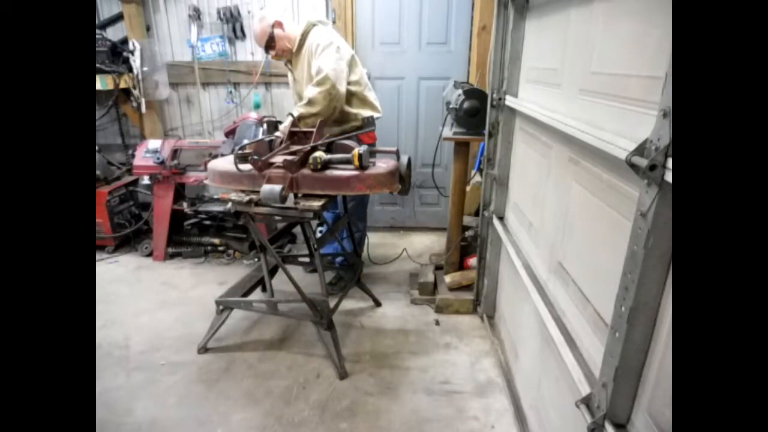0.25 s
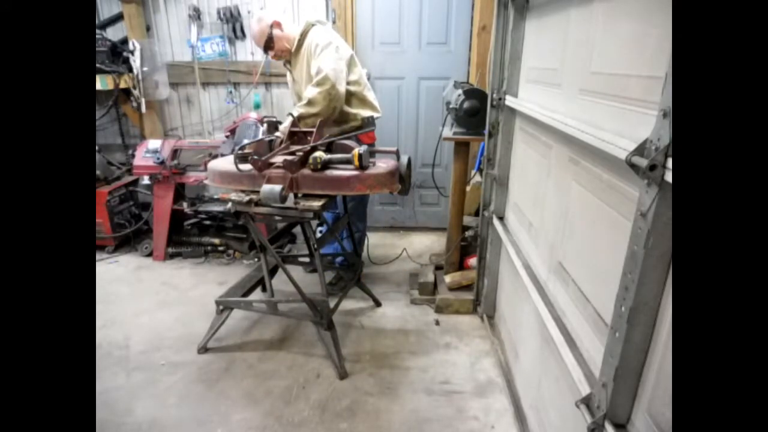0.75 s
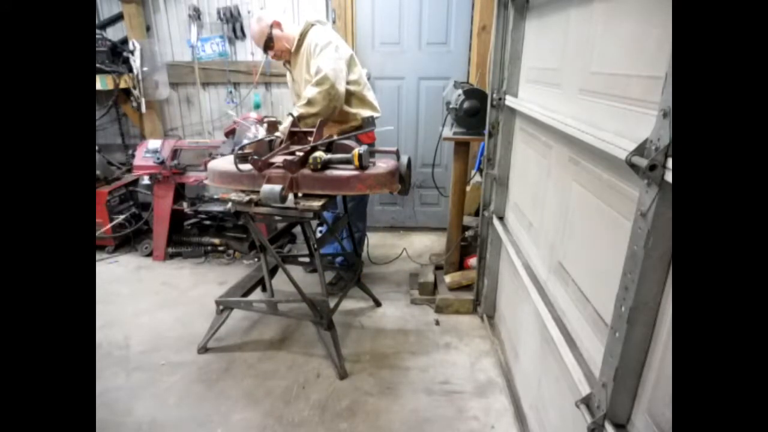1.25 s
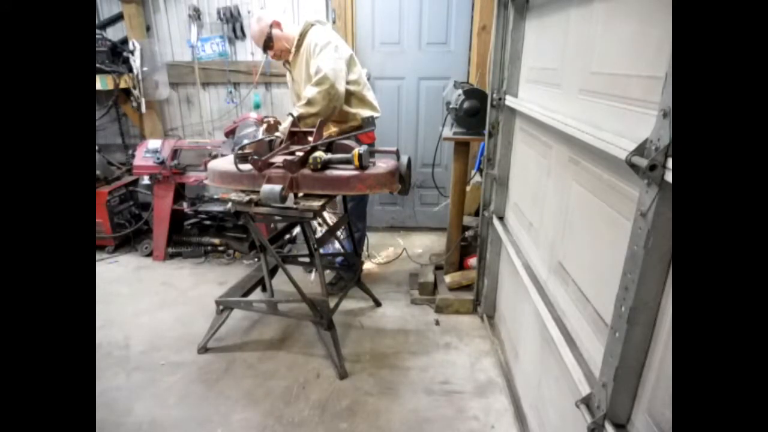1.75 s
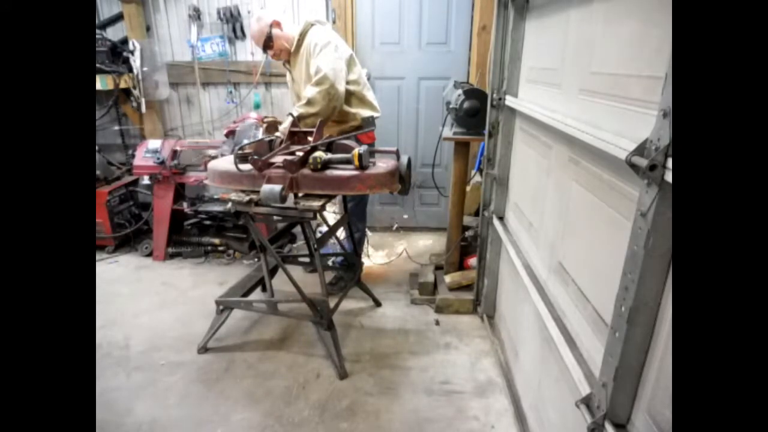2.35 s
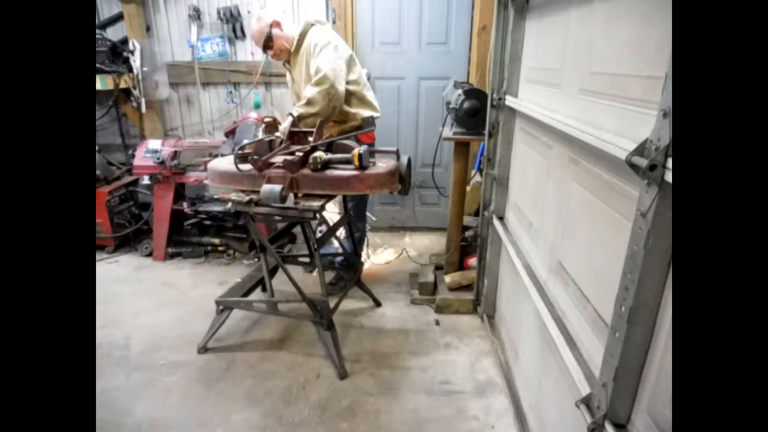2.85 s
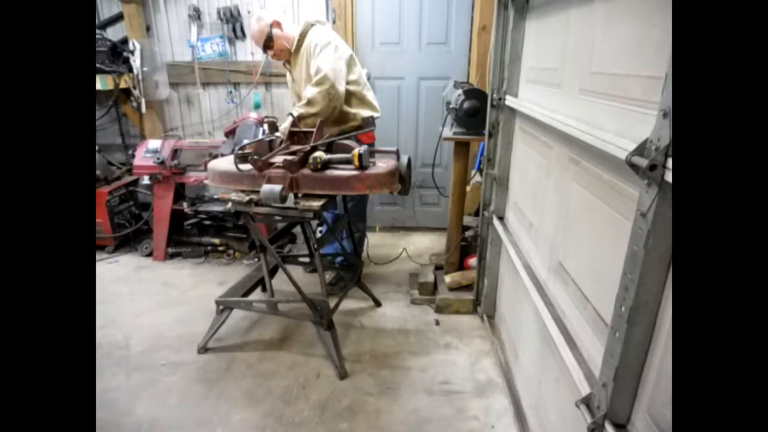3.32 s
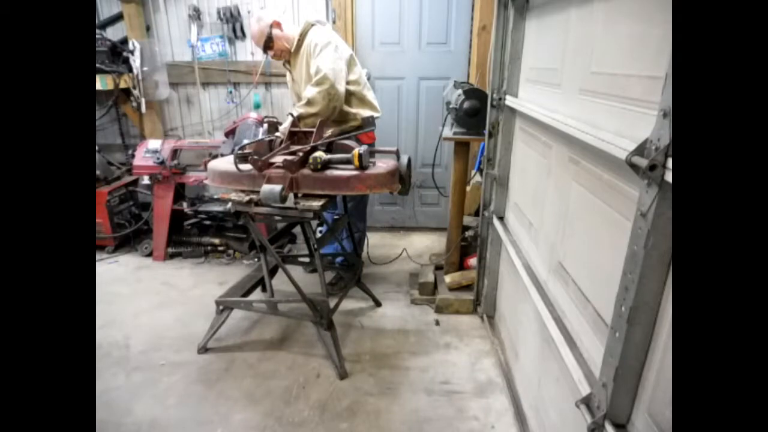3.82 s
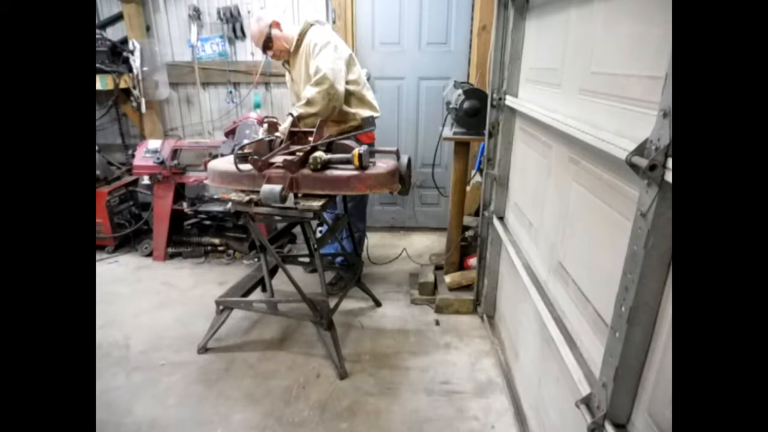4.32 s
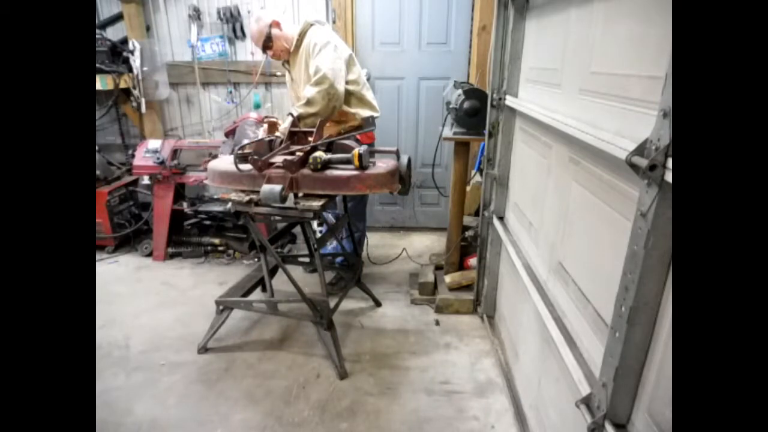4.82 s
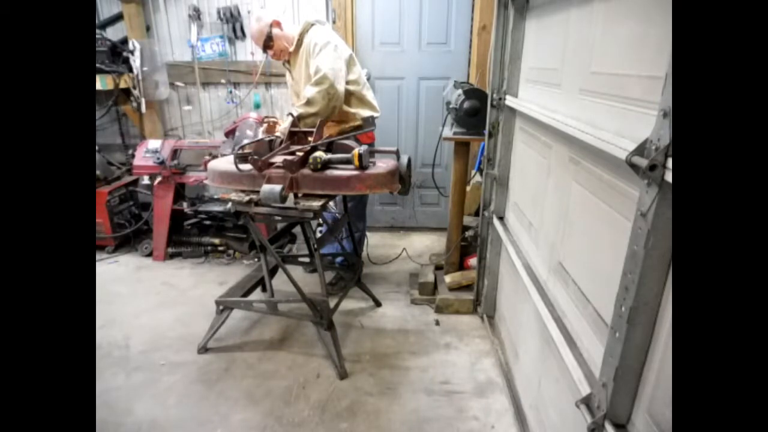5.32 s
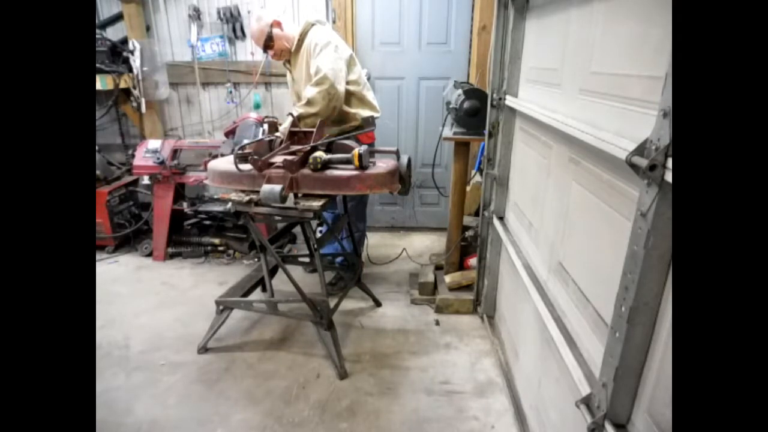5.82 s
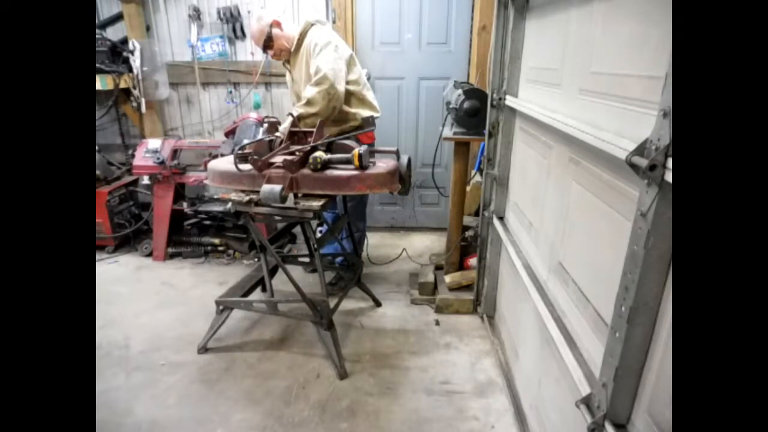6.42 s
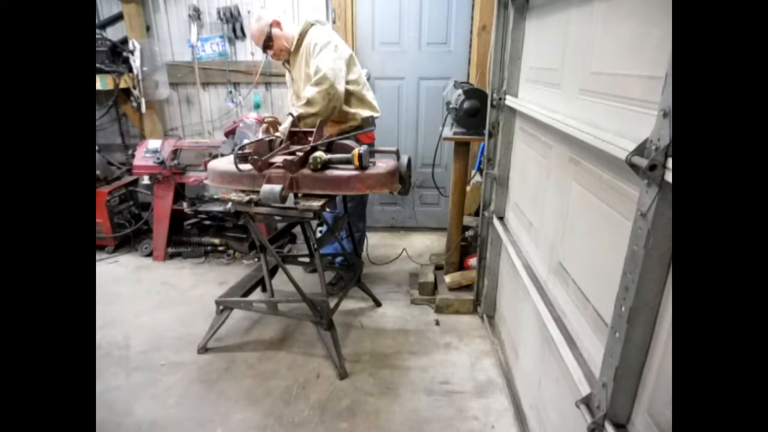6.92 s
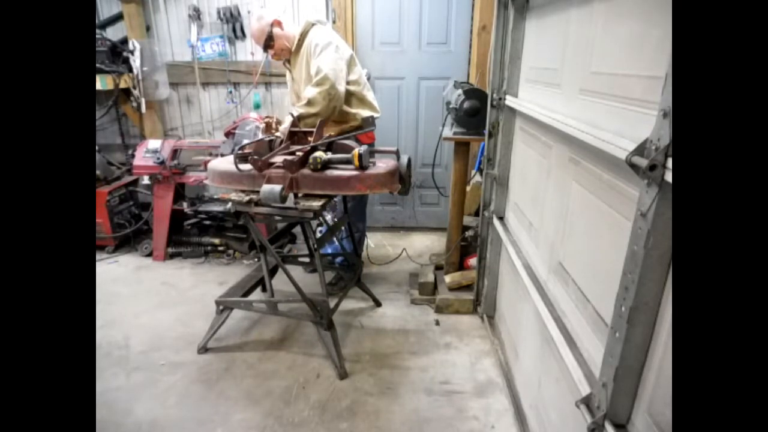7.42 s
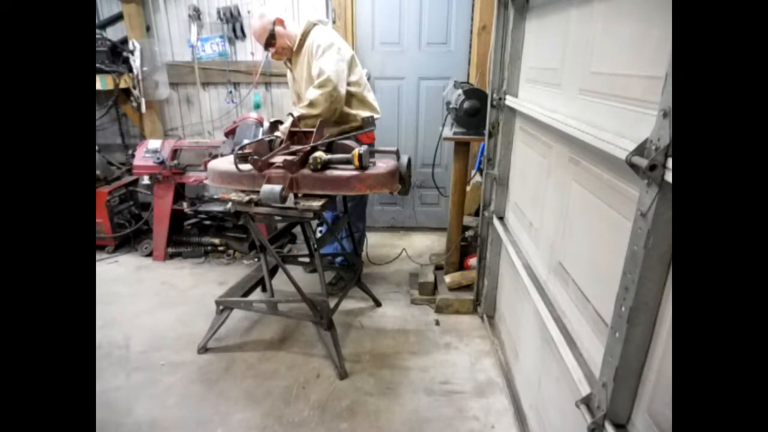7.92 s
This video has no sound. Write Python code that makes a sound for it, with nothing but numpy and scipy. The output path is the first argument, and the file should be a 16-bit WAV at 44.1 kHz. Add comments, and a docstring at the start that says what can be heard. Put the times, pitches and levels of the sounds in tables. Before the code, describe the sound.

A plasma torch hisses loudly and steadily in a hard-walled garage, whistling shrilly with brief squeals as its air jet cuts through steel.

```python
"""In a garage, a hand-held plasma torch cuts a steel bracket a few metres from the microphone.
The air jet hisses throughout (shaped patchy noise); spilling over the steel it flares into a fluttering
roar (noise with rapid random gain). Blowing down the narrow kerf it whistles in several jittering
edge tones, and now and then one sings out in a squeal. Hard walls scatter it all."""
import sys
import numpy as np
from scipy import signal
from scipy.fft import rfft, irfft, next_fast_len
from scipy.io import wavfile
from scipy.ndimage import uniform_filter1d, map_coordinates

SR = 44100
rng = np.random.default_rng(int(sys.argv[2]) if len(sys.argv) > 2 else 0)


def store_wav(level_fs):
    """Save 16-bit WAV to argv[1]."""
    pcm = np.round(np.clip(np.atleast_2d(level_fs), -1, 1) * 32767)
    wavfile.write(sys.argv[1], SR, pcm.T.astype(np.int16))


N = 359856  # samples


def amp(db):
    """Decibels to gain."""
    return 10 ** (np.asarray(db) / 20)


def unit(x):
    """x at rms 1."""
    return x / np.sqrt(np.mean(np.abs(x) ** 2) + 1e-20)


def along(points, hz):
    """(Hz, value) points read on a log frequency axis."""
    point_hz, value = np.transpose(points)
    return np.interp(np.log(hz + 1), np.log(point_hz + 1), value)


def wobble(rate_hz):
    """Smooth random curve: a cubic spline on normal random knots, rate_hz of them a second."""
    knots = rng.standard_normal(int(N * rate_hz / SR) + 4)
    coarse = np.arange(0, N, 12)
    spline = map_coordinates(knots, [coarse * rate_hz / SR])
    return np.interp(np.arange(N), coarse, spline)


def gate(start_s, end_s, fade_s):
    """1 from start to end, 0 outside, with linear ramps centred on both."""
    t = np.arange(N) / SR
    from_edge_s = np.minimum(t - start_s, end_s - t)
    return np.clip(.5 + from_edge_s / fade_s, 0, 1)


def filtered(x, response):
    """x times a response of frequency."""
    m = next_fast_len(N + SR // 4)
    spectrum = rfft(x, m) * response(np.fft.rfftfreq(m, 1 / SR))
    return irfft(spectrum, m)[..., :N]


# left-right correlation of the noise: (frequency [Hz], correlation [-1 to 1])
LIKENESS = [(100, .03), (1000, 0.051), (2000, 0.21), (2600, 0.3), (3800, 0.36), (5000, 0.2), (8000, 0.33),
            (10500, 0.23), (15000, .08)]


def rush(spectrum, patchy_db):
    """Turbulent stereo noise of rms 1: eddies give it time-frequency patches of random gain."""
    z = signal.stft(rng.standard_normal((2, N)), nperseg=512)[2]
    field = uniform_filter1d(rng.standard_normal(z.shape[1:]), size=8, axis=0)
    field = uniform_filter1d(field, size=14, axis=1)
    patchy = z * amp(patchy_db * unit(field))
    pair = signal.istft(patchy, nperseg=512)[1][:, :N]

    def mid_side(hz):
        turn = np.arccos(np.clip(along(LIKENESS, hz), -1, 1)) / 2
        return amp(along(spectrum, hz)) * [np.cos(turn), np.sin(turn)]

    mid, side = filtered(pair, mid_side)
    return unit(np.array([mid + side, mid - side]))


def edge_tone(pitch_hz, level_db, jitter_hz, flicker_db):
    """Vortices shed at the cut edge: a tone whose pitch jitters fast and whose strength flickers."""
    hz = pitch_hz + jitter_hz * wobble(700)
    tone = np.sin(2 * np.pi * np.cumsum(hz) / SR)
    return amp(level_db) * unit(tone * amp(flicker_db * wobble(16)))


# reverberation: (frequency [Hz], 60 dB decay time [s])
GARAGE_DECAY = [(500, 1), (4000, 0.17), (12000, 0.058)]


def garage(x, direct_share):
    """The straight path plus a diffuse tail for each ear, sharing the energy between them."""
    hz, t, z = signal.stft(rng.standard_normal((2, SR // 3)), SR, nperseg=256)
    decay_db = -60 * t / along(GARAGE_DECAY, hz)[:, None]
    tail = signal.istft(z * amp(decay_db), SR, nperseg=256)[1]
    tail /= np.linalg.norm(tail[0])
    wet = signal.fftconvolve(x[None], tail, axes=1)[:, :N]
    return np.sqrt(direct_share) * x + np.sqrt(1 - direct_share) * wet


def near_walls(x, echo_db, count=7):
    """A few early reflections, mostly of the treble, comb the sound into fine steady strands."""
    delay_s = rng.uniform(.005, .022, (count, 1)) + rng.uniform(0, 1e-4, (count, 2))
    taps = np.zeros((2, SR // 40))
    taps[[0, 1], np.round(delay_s * SR).astype(int)] = amp(echo_db) / np.sqrt(count)
    treble = filtered(x, lambda hz: hz ** 4 / (hz ** 4 + 2000 ** 4))
    echoes = signal.fftconvolve(treble, taps, axes=1)[:, :N]
    return (x + echoes) / np.sqrt(1 + amp(2 * echo_db))


# narrow peaks and notches of the space around the workpiece:
# (centre [Hz], full width at half gain [Hz], gain at depth 1 [dB])
SPACE_RESONANCES = [(2150, 110, -1.3), (2270, 60, 1.5), (2500, 45, 2.8), (2627, 50, 2.2), (2971, 50, 2),
                    (3520, 60, 1.8), (3680, 60, -1.5), (3778, 55, 2.6), (3951, 50, 2), (4230, 60, -1.5),
                    (4543, 55, 2.9), (4864, 50, 2.2), (5308, 43, 1.8), (5612, 40, 2.8), (5730, 70, -1.3),
                    (5903, 48, 2.9), (5995, 55, -1.8), (6093, 32, 1.9), (6135, 32, 1.1), (6219, 32, 1.5),
                    (6320, 60, -1.8), (6401, 43, 2.2), (7710, 45, 2.2), (7805, 40, 1.4), (7890, 50, -1.3),
                    (8060, 50, 1.8), (8171, 40, 1.1), (9040, 30, 2)]


def coloured(x, depth):
    """x shaped by the fixed resonances of the space around the workpiece; depth scales their dB."""
    def response(f):
        ripple_db = sum(db / (1 + (2 * (f - hz) / width_hz) ** 2)
                        for hz, width_hz, db in SPACE_RESONANCES)
        return amp(depth * ripple_db)

    return filtered(x, response)


def scattered(tone, depth):
    """A tone from the small cutting spot through garage, near walls and resonances, energy kept."""
    reverberant = garage(tone, direct_share=0.35)
    heard = coloured(near_walls(reverberant, echo_db=-10), depth)
    return np.std(tone) * np.array([unit(ear) for ear in heard])


# stretches where the jet passes down through the steel:
# (start [s], end [s], slot deepening time [s], deep main tone level [dB], deep upper tone level [dB])
KERF_CUTS = [(0.609, 3.29, 0.8, -29, -28), (3.82, 5.72, 0.3, -27.5, -31.5), (6.15, 7.63, 0.25, -29.5, -32)]
SWITCH_S = 0.037


def slot():
    """Share of the jet in the slot (0-1), slot shallowness (0-1), main and upper tone levels [dB]."""
    t = np.arange(N) / SR
    inside = sum(gate(start_s, end_s, SWITCH_S) for start_s, end_s, *_ in KERF_CUTS)
    latest = np.searchsorted([cut[0] - SWITCH_S for cut in KERF_CUTS[1:]], t)
    start_s, _, deepen_s, main_db, upper_db = np.array(KERF_CUTS)[latest].T
    shallow = np.exp(-((t - start_s) / deepen_s) ** 2)
    return inside, shallow, main_db, upper_db


# noise spectra of the nozzle and of the spilling air: (frequency [Hz], relative density [dB per Hz])
HISS_SPECTRUM = [(12, -15), (35, -5), (200, -5.5), (900, -4), (2100, -2.5), (2400, -2.5), (3150, -1.4),
                 (4300, -1.65), (5500, -1.5), (7000, -3.5), (9000, -4), (9800, -7.5), (10800, -6.5),
                 (11500, -10.5), (12600, -11), (15600, -19.5)]
FLARE_SPECTRUM = [(20, -17), (100, -9), (700, -9), (2000, -3), (2450, 0.5), (3050, -0.5), (3600, 2),
                  (4500, -3), (6000, -8.5), (8000, -28), (9800, -6), (11200, -15.5), (12500, -36),
                  (15600, -35)]
# the torch strays and part of the jet splashes over the steel: (start [s], end [s], level [dB])
JET_SPILLS = [(0.72, 0.913, -24.5), (1.25, 1.42, -28), (1.58, 1.722, -28), (1.896, 2.14, -27.5),
              (2.54, 2.75, -29), (4.32, 4.5, -37), (4.777, 5.2, -30), (5.5, 5.64, -26), (6.36, 6.68, -26),
              (7.16, 7.28, -28)]
SPILL_FADE_S = 0.13
HISS_DB = -21.5
# flare off the slot, leaking past a deep slot, leaking past a shallow one
FLARE_DB, LEAK_DB, SHALLOW_LEAK_DB = -21.5, -31, -27


def jet():
    """The steady hiss of the nozzle, and the ragged roar of air spilling over the steel."""
    inside, shallow, _, _ = slot()
    hiss = amp(HISS_DB + 0.15 * wobble(4)) * rush(HISS_SPECTRUM, patchy_db=0.74)
    leak_db = LEAK_DB + (SHALLOW_LEAK_DB - LEAK_DB) * shallow + 1.1 * wobble(9)
    power = amp(FLARE_DB + inside * (leak_db - FLARE_DB)) ** 2
    for start_s, end_s, db in JET_SPILLS:
        power += (amp(db) * gate(start_s, end_s, SPILL_FADE_S)) ** 2
    flutter = unit(amp(0.41 * wobble(30) + 1.6 * wobble(300)))
    flare = np.sqrt(power) * flutter * rush(FLARE_SPECTRUM, patchy_db=0.7)
    return hiss + flare


# faint tones of the slot: (pitch [Hz], shallow level [dB], deep level [dB], jitter scale [Hz])
SLOT_OVERTONES = [(6720, -33.5, -39, 64), (10320, -37, -40.5, 89.4)]
# pitches in a deep slot; RISE and SHALLOW are added at full shallowness
LOW_HZ, LOW_RISE_HZ, LOW_DB = 4093, 500, -32
MAIN_HZ, MAIN_SHALLOW_DB = 6060, -3
UPPER_HZ, UPPER_RISE_HZ, UPPER_SHALLOW_DB = 7825, 260, -9
YIELD_DB = -25.5  # a squeal this loud takes half the power from the strong tones


def kerf():
    """The slot whistles while the jet is in it; the unsteady hand makes the three chief pitches wander.

    As it deepens the low and upper tones sink, main and upper grow, and the overtones recede."""
    inside, shallow, main_db, upper_db = slot()
    main_db = main_db + MAIN_SHALLOW_DB * shallow
    upper_db = upper_db + UPPER_SHALLOW_DB * shallow
    main_hz = MAIN_HZ + 60 * wobble(14)
    low_hz = LOW_HZ + LOW_RISE_HZ * shallow + 90 * wobble(10)
    upper_hz = UPPER_HZ + UPPER_RISE_HZ * shallow + 80 * wobble(18)

    main = edge_tone(main_hz, main_db, jitter_hz=185.1, flicker_db=0.7)
    upper = edge_tone(upper_hz, upper_db, jitter_hz=179.5, flicker_db=1.0)
    faint = edge_tone(low_hz, LOW_DB, jitter_hz=244.8, flicker_db=2.4)
    for hz, shallow_db, deep_db, jitter_hz in SLOT_OVERTONES:
        level_db = deep_db + (shallow_db - deep_db) * shallow
        faint += edge_tone(hz, level_db, jitter_hz, flicker_db=3.5)
    # octave of the main tone
    faint += edge_tone(2 * main_hz, main_db - 16, jitter_hz=380, flicker_db=5.0)

    # one jet feeds all tones: the strong ones give way to a squeal
    rival = sum(amp(db - YIELD_DB) ** 2 * gate(start_s, end_s, SQUEAL_FADE_S)
                for start_s, end_s, _, db, _ in SLOT_SQUEALS)
    drive = inside / np.sqrt(1 + rival)
    strong = scattered(drive * main, depth=3.0) + scattered(drive * upper, depth=3.8)
    return strong + scattered(inside * faint, depth=3.3)


# moments when one tone locks in and sings out:
# (start [s], end [s], mid pitch [Hz], level [dB], jitter scale [Hz])
SLOT_SQUEALS = [(1.008, 1.282, 6040, -25.5, 109), (1.443, 1.658, 4860, -33, 80), (1.46, 1.8, 8640, -34, 85),
                (1.841, 1.998, 3850, -29, 140), (2.278, 2.53, 7760, -31, 170),
                (2.348, 3.076, 8630, -31.5, 91.4), (2.697, 3.08, 5260, -34, 80),
                (3.046, 3.283, 7760, -31.5, 169.4), (3.847, 4.06, 10400, -34, 120),
                (4.234, 4.475, 7950, -29, 149), (4.547, 4.706, 6110, -23.5, 69),
                (4.959, 5.32, 4500, -33.5, 110), (5.492, 5.645, 5880, -30.5, 90),
                (6.162, 6.318, 8040, -30, 90), (6.431, 6.53, 6100, -27.5, 99.6),
                (6.837, 7.219, 6135, -26, 80), (6.868, 7.01, 7720, -29.5, 80),
                (7.142, 7.322, 8080, -33.5, 101.4), (7.404, 7.557, 10280, -34.5, 100)]
SQUEAL_FADE_S = 0.082
SAG_HZ_PER_S, SAG_LIMIT_HZ = 333, 60


def squeals():
    """Now and then one tone of the slot locks in and sings out, sinking a little as it lasts."""
    t = np.arange(N) / SR
    tones = np.zeros(N)
    for start_s, end_s, hz, db, jitter_hz in SLOT_SQUEALS:
        middle_s = (start_s + end_s) / 2
        sag_hz = np.clip(SAG_HZ_PER_S * (t - middle_s), -SAG_LIMIT_HZ, SAG_LIMIT_HZ)
        tone = edge_tone(hz - sag_hz, db, jitter_hz, flicker_db=1.5)
        tones += gate(start_s, end_s, SQUEAL_FADE_S) * tone
    return scattered(tones, depth=2.5)


def scene():
    """The rush of the jet with the whistles and squeals of the slot on top."""
    air = coloured(near_walls(jet(), echo_db=-9.5), depth=1.0)
    return air + kerf() + squeals()


LEFT_LEAD_SAMPLES = 0.44
TOP_HZ = 15720


def record(dry):
    """The left channel leads slightly; peaks are gently rounded; the band is cut off at the top."""
    def lead(hz):
        return np.exp(1j * np.pi * hz / SR * LEFT_LEAD_SAMPLES * np.array([[1], [-1]]))

    x = filtered(dry, lead)
    rounded = x / (1 + (x / .52) ** 4) ** (1 / 4)
    return filtered(rounded, lambda hz: hz < TOP_HZ)


dry = scene()
out = record(dry)
store_wav(out)
```